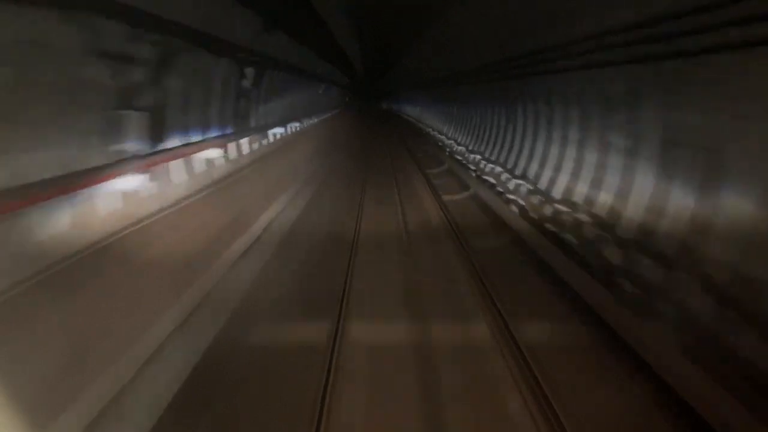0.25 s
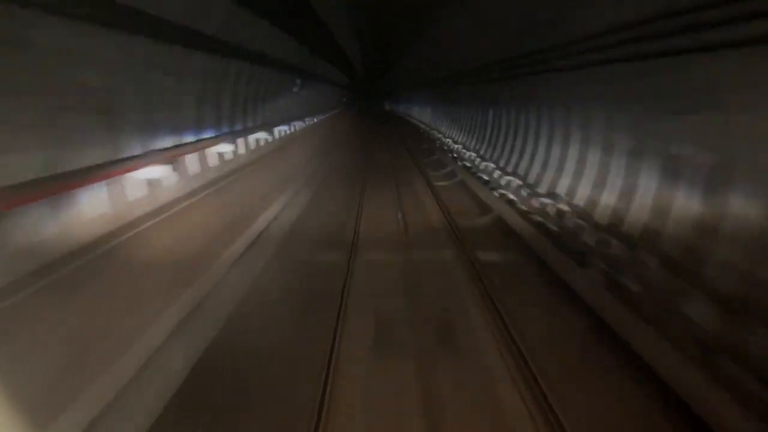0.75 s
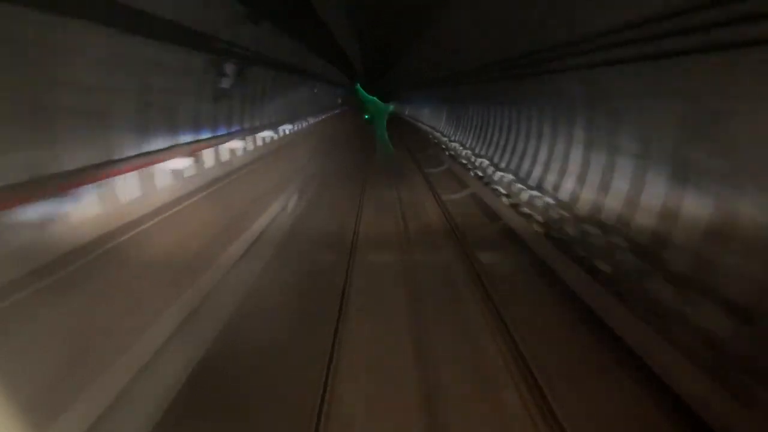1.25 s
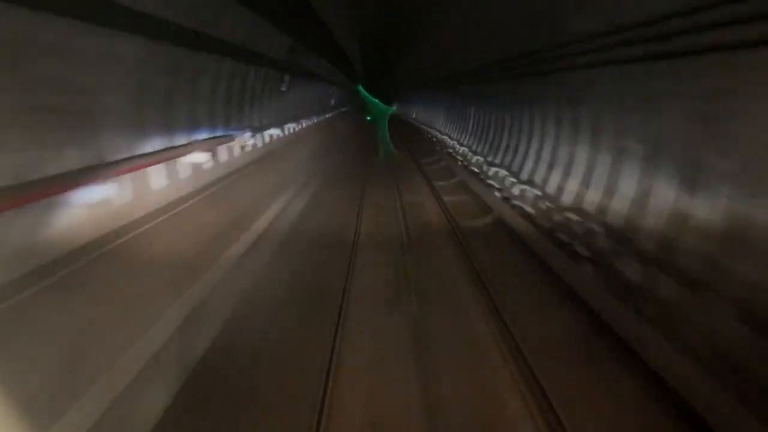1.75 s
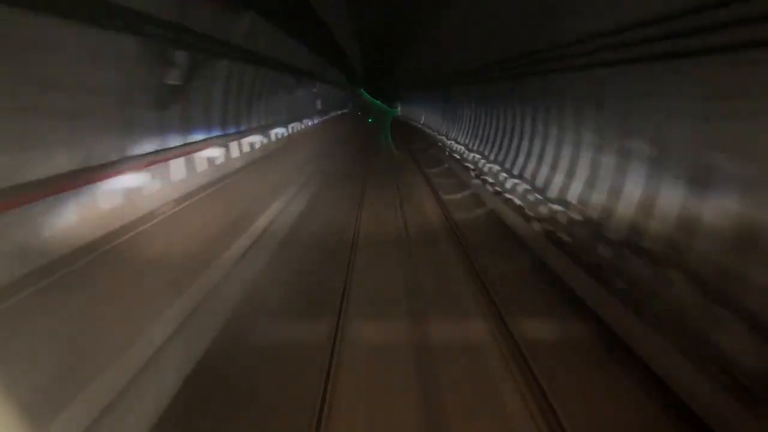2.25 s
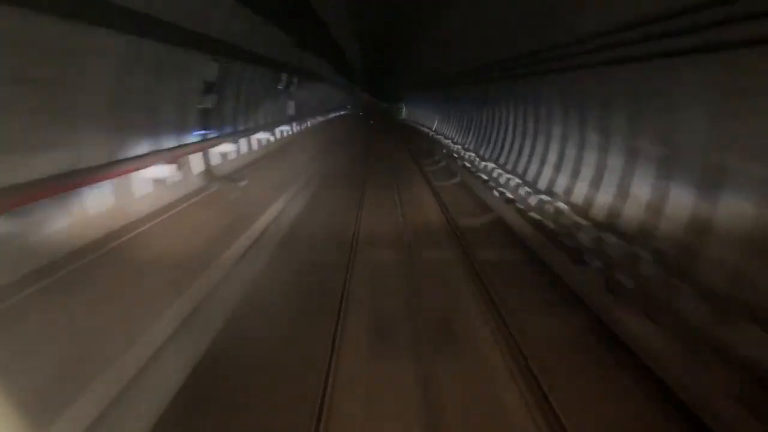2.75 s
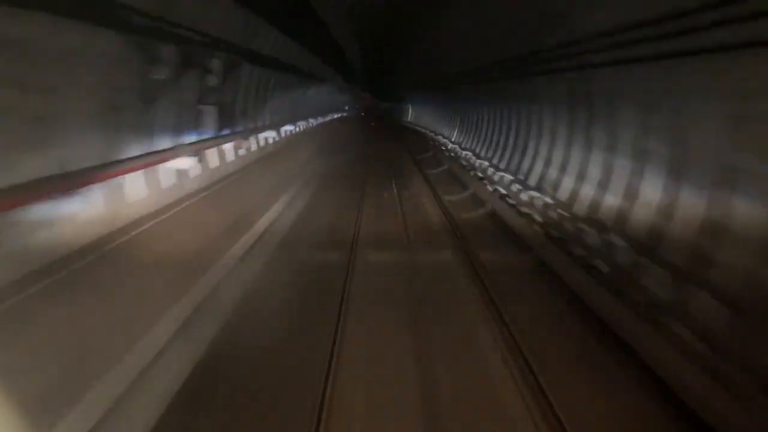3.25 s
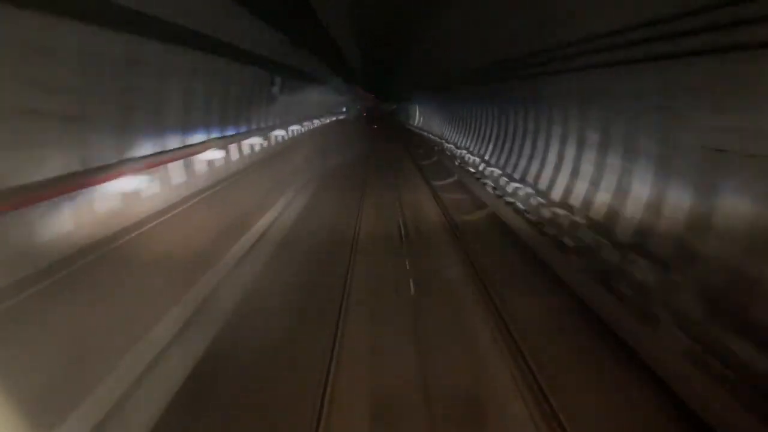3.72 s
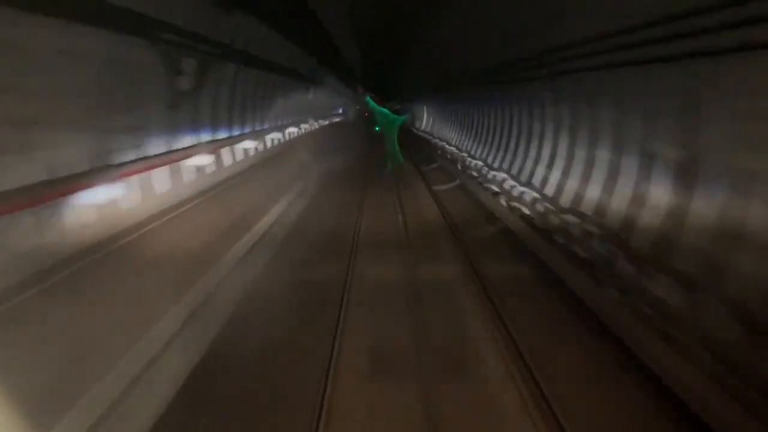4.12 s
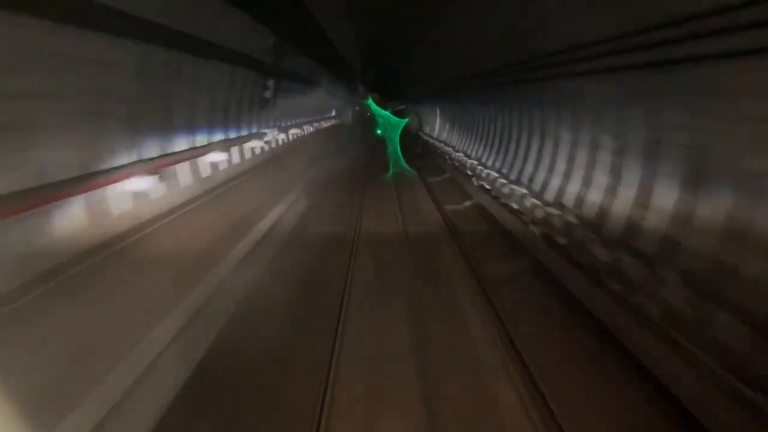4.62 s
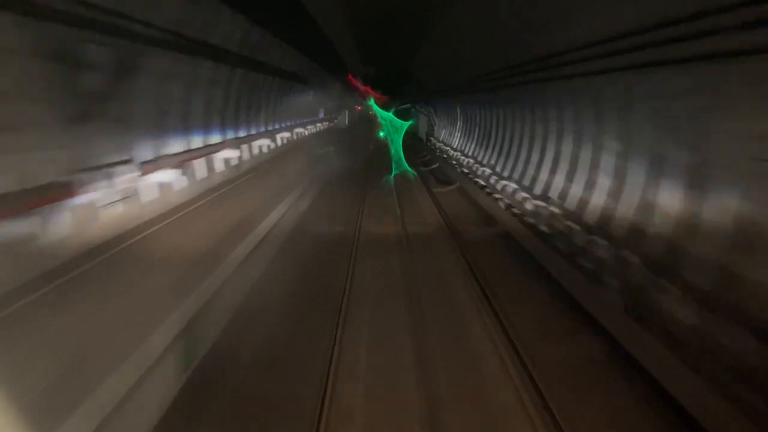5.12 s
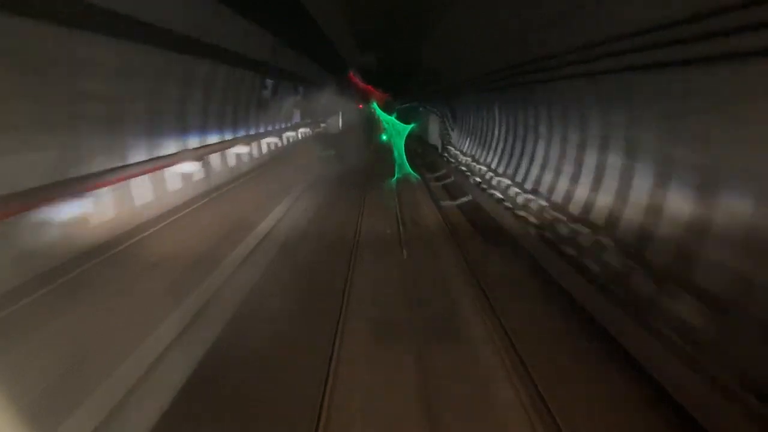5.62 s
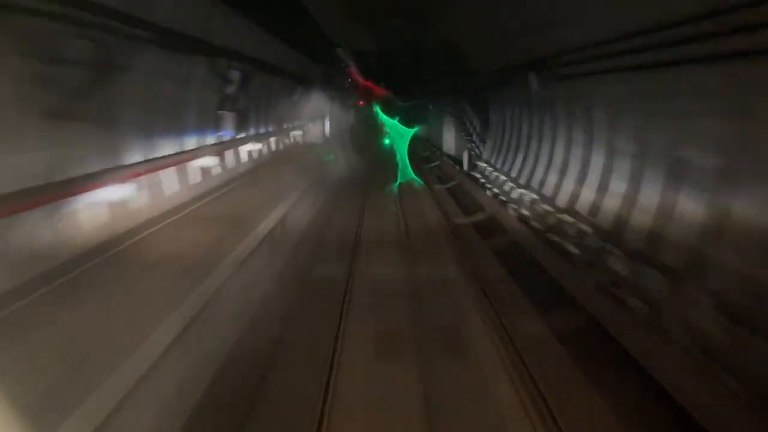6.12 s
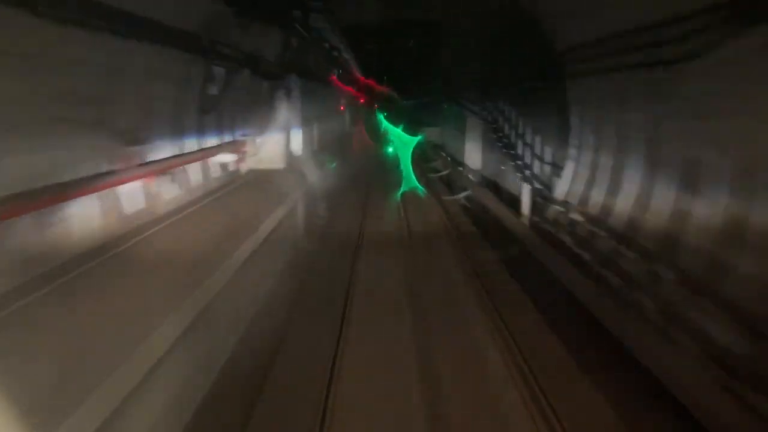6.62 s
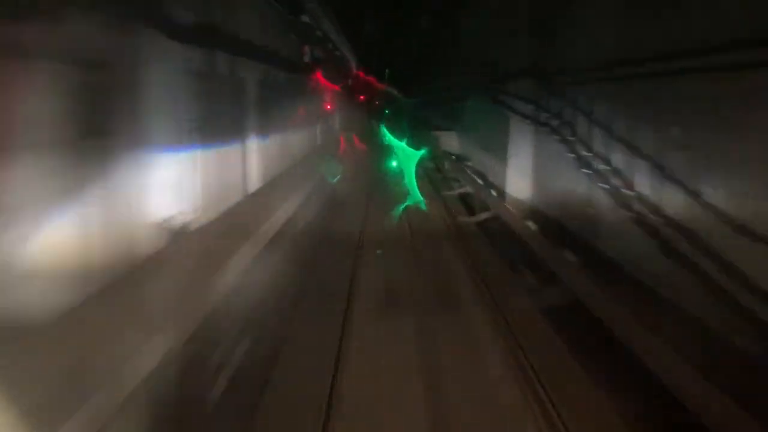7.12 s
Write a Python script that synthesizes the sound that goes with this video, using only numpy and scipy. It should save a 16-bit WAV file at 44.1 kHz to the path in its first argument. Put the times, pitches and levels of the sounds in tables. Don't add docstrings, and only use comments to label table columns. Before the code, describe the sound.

A metro train runs fast through a tunnel with heavy rolling rumble, dull low thumps, a wavering high whine and faint flange squeal later.

```python
import sys
import numpy as np
from scipy import signal
from scipy.fft import rfft, irfft, next_fast_len
from scipy.io import wavfile
from scipy.ndimage import map_coordinates

SR = 44100
rng = np.random.default_rng(int(sys.argv[2]) if len(sys.argv) > 2 else 0)


def attenuation_scalar(level_db):
    decades = np.asarray(level_db, float) / 20
    return 10 ** decades


def wav_out(sig):
    wavfile.write(sys.argv[1], SR, np.round(np.clip(np.atleast_2d(sig).T, -1, 1) * 32767).astype(np.int16))


N = 325017

# (time [s], peak [dB], length [s], pitch [Hz])
BODY_BUMPS = [(0.154, -15.5, 0.081, 57.93), (0.303, -25, 0.05, 62.06), (0.619, -15.5, 0.051, 60.88),
              (0.854, -16, .13, 62.2), (1.004, -13.7, 0.053, 60.74), (1.608, -20, .1, 58.7),
              (1.842, -13, 0.055, 63.37), (1.978, -13, 0.055, 57.1), (2.504, -10.5, 0.1, 60.16),
              (2.638, -11, 0.053, 59.5), (2.871, -10, 0.06, 61.98), (2.987, -11.5, 0.092, 58.04),
              (3.58, -11, 0.14, 58.86), (3.687, -14, .06, 62.5), (3.911, -12.8, 0.059, 65.2),
              (4.065, -16, .06, 72.4), (4.197, -13, .06, 57.68), (4.422, -16, 0.054, 61.6),
              (4.832, -13.1, 0.2, 63.05), (5.24, -15.2, 0.08, 59.02), (5.403, -20, .06, 65.44),
              (5.523, -24, .06, 61.4), (5.832, -21.5, 0.11, 59.2), (6.01, -13, 0.066, 63.33),
              (6.191, -10, 0.1, 58.75), (6.448, -12.5, 0.14, 58.3), (6.563, -11.7, 0.057, 59.7),
              (6.87, -14.5, 0.073, 56.94), (7.108, -11, .06, 59.5), (7.24, -11.5, 0.064, 60.1)]
# (time [s], level [dB])
RAIL_ROUGHNESS = [(0, -22), (.24, -21), (.53, -19.5), (.62, -22.5), (.88, -19), (1.35, -21), (1.54, -19.5),
                  (1.7, -21.5), (3.26, -21), (4.15, -19.5), (4.3, -22.5), (4.47, -19.5), (5.05, -21.5),
                  (5.5, -20), (5.95, -22), (6.72, -18.5), (7.0, -21.5), (7.37, -19.5)]
# (frequency [Hz], density [dB/Hz])
RUMBLE_SHARED = [(15, -58.5), (22, -35), (36, -14), (50, -2.5), (60, -0.5), (85, -1.5), (110, -6.5),
                 (125, -4.5), (157, -10.5), (209, -9.5), (270, -14.5), (300, -16.5), (390, -37.5),
                 (660, -120)]
RUMBLE_OPPOSED = [(15, -51.5), (22, -21.5), (59, -4), (151, -14), (215, -4.5), (245, -5.5), (290, -12),
                  (390, -39), (660, -120)]
# (frequency [Hz], density [dB/Hz])
ROAR_SHARED = [(180, -38), (300, -6.5), (377, -3), (437, -1), (549, -6.5), (868, -3), (977, -8.5),
               (1120, -18.5), (1500, -24), (1630, -23), (1750, -23.5), (2280, -58), (3850, -120)]
ROAR_OPPOSED = [(200, -42), (300, -7.5), (330, -7), (400, -3.5), (570, -6), (760, -5.5), (1040, -13.5),
                (1220, -10.5), (1750, -21.5), (2280, -52), (3850, -120)]
# (time [s], pitch [Hz])
MESH_PITCH = [
    (0, 2055),
    (1.7, 2064),
    (3.5, 2069),
    (4.1, 2052),
    (7.37, 2081),
]
# (time [s], peak [dB], length [s])
MESH_BEATS = [(0.04, -32, 0.27), (0.8, -34.5, 0.11), (0.97, -36.5, 0.06), (1.23, -35.5, 0.09),
              (1.7, -30, 0.28), (2.11, -33.6, 0.083), (2.47, -32.5, 0.15), (2.9, -31, 0.1),
              (3.26, -31.5, 0.08), (3.41, -32.5, 0.17), (3.89, -36.5, 0.3), (4.33, -34, 0.049),
              (4.59, -36.5, 0.17), (4.9, -30.5, 0.12), (5.2, -38, 0.059), (5.41, -33.5, 0.077),
              (5.57, -32, 0.067), (5.76, -33.5, 0.16), (5.98, -35, 0.11), (6.15, -36, 0.14),
              (6.41, -36, 0.082), (6.78, -29.0, 0.17), (7.14, -37, 0.1), (7.31, -43, 0.1)]
# (frequency [Hz], density [dB/Hz])
TEETH_SHARED = [(1650, -120), (1720, -10.5), (1850, -2), (1930, 4.5), (2070, 7), (2200, 3), (2300, -3.5),
                (2450, -9), (2600, -11.5), (2700, -120)]
TEETH_OPPOSED = [(1650, -120), (1760, -10), (1870, -4.5), (1920, 3.5), (2050, -1), (2200, -12.5),
                 (2350, -11.5), (2600, -29), (2700, -120)]
# (frequency [Hz], width [Hz], level [dB], right port gain [ratio])
PANEL_MODES = [(191.5, 12, -33.5, 1), (212.5, 16, -31.5, 0.65), (326, 28, -41.5, 1), (358.3, 33, -37, 0.73),
               (433, 27, -36.5, 1), (466.6, 26, -36, .8), (522, 10, -42, -1.3), (718, 57, -39.5, 0.99),
               (870, 42, -36.5, 0.38), (954, 36, -38.5, 0.56), (410, 16, -46, -0.92), (2166, 21, -49, 0.99),
               (3163, 120, -51, 0.4), (9700, 90, -88, .1)]
# (time [s], peak [dB], length [s])
LOW_PANEL_JOLTS = [(0.52, -20, 0.13), (0.99, -22, 0.18), (1.55, -21, 0.16), (1.91, -23.5, 0.17),
                   (3.75, -23, 0.14), (4.18, -24, 0.15), (4.5, -22, 0.18), (4.75, -24.5, 0.16),
                   (5.28, -23.7, 0.18), (5.59, -23.5, 0.2), (6.44, -24.5, 0.16), (6.79, -26, 0.2)]
MIDDLE_PANEL_JOLTS = [(0.5, -30.5, 0.4), (3.89, -27.5, 0.4), (4.52, -28.5, 0.2), (4.72, -27, 0.22),
                      (5.13, -24.5, 0.16), (5.69, -25, 0.28), (6.0, -25, 0.14), (6.5, -24.5, 0.18),
                      (6.9, -28.5, 0.16), (7.32, -24.5, 0.14)]
# (frequency [Hz], level [dB], right port gain [ratio])
CONVERTER_TONES = [
    (282.4, -32.5, -.5),
    (399.5, -37, .8),
    (564.8, -39.5, -1.0),
    (1187, -46, -.3),
]
# (frequency [Hz], density [dB/Hz])
HISS_SHARED = [(2300, -58), (2600, -6.5), (2800, -2.5), (3000, -8.5), (3500, -16), (3900, -12), (4050, -14),
               (4450, -12.5), (4700, -21), (5300, -17.5), (6200, -23), (6500, -27), (7500, -36.5),
               (8200, -120)]
HISS_OPPOSED = [(2300, -58.5), (2550, -1), (3000, 1.5), (3500, -2), (3900, -5.5), (4100, -7), (4800, -10),
                (5300, -5.5), (5800, -14.5), (6500, -17), (7300, -19.5), (8800, -20), (9600, -23),
                (10500, -120)]
# (frequency [Hz], density [dB/Hz])
FIZZ_SHARED = [(7000, -120), (7500, -17.5), (8800, -7.5), (9400, -2), (9750, 0), (11000, -2.5), (12100, -4),
               (12400, -7.5), (13700, -10.5), (13900, -22), (16000, -120)]
FIZZ_OPPOSED = [(8500, -120), (9200, -8.5), (9750, -4), (10200, -10), (11500, -28), (12600, -17.5),
                (13500, -11), (14600, -4), (15200, -6.5), (15700, -11.5), (16000, -120)]
# (time [s], peak [dB], length [s])
FLANGE_RUBS = [
    (4.03, -48, .15),
    (4.32, -47.5, .25),
    (4.85, -43.5, .55),
    (5.38, -43.5, 0.39),
    (5.82, -42.5, 0.22),
    (6.4, -49, .7),
]
# (frequency [Hz], lean [-1 right .. 1 left])
PORT_LEAN = [(40, .2), (150, .25), (240, .4), (340, -.05), (480, .15), (620, 0), (1100, .15), (1500, .1),
             (1800, .5), (2100, .15), (2600, -.2), (3300, .6), (5000, .4), (7000, 0)]
# (frequency [Hz], share [ratio])
PORT_AHEAD = [(200, -.1), (500, -.3), (1000, -.3), (1700, 0), (2200, .1), (3000, .3), (4300, .1),
              (5000, .3), (5600, 0), (6500, -.5), (7300, -.3), (9000, 0)]


def unit(x):
    return x / np.sqrt(np.mean(x ** 2) + 1e-20)


def along(points, hz):
    f, v = np.transpose(points)
    return np.interp(np.log(hz + 1), np.log(f + 1), v)


def curves(rows):
    time_s, *columns = np.transpose(rows)
    return [np.interp(np.arange(N) / SR, time_s, column) for column in columns]


def wobble(rate_hz):
    knots = rng.standard_normal(int(N * rate_hz / SR) + 4)
    return map_coordinates(knots, [np.arange(N) * rate_hz / SR])


def swells(rows, rest_db):
    t = np.arange(0, N + 64, 64) / SR
    power = attenuation_scalar(2 * rest_db)
    for time_s, peak_db, length_s, *_ in rows:
        bell = np.exp(-2 * np.log(16) * ((t - time_s) / (1.15 * length_s)) ** 2)
        power = power + attenuation_scalar(2 * peak_db) * bell
    return np.interp(np.arange(N) / SR, t, 10 * np.log10(power))


def filtered(x, response):
    m = next_fast_len(N + 8192)
    return irfft(rfft(x, m) * response(np.fft.rfftfreq(m, 1 / SR)), m)[..., :N]


def ring(hz, width_hz):
    noise = rng.standard_normal(N)
    return unit(filtered(noise, lambda f: 1 / (1 + ((f - hz) / width_hz * 2) ** 2)))


def tone(hz, drift_rad):
    return np.sqrt(2) * np.sin(2 * np.pi * np.cumsum(hz) / SR + drift_rad)


def ports(left, right):
    return np.array([[left], [right]])


def rush(shared, opposed, side_db):
    common, separate = rng.standard_normal((2, N))

    def link(hz):
        lean = np.clip(along(PORT_LEAN, hz), -.7, .7)
        ahead = np.clip(along(PORT_AHEAD, hz), -.7, .7)
        return lean + 1j * ahead

    def linked(hz):
        return attenuation_scalar(along(opposed, hz)) * link(hz)

    def unlinked(hz):
        return attenuation_scalar(along(opposed, hz)) * np.sqrt(1 - abs(link(hz)) ** 2)

    mid = unit(filtered(common, lambda hz: attenuation_scalar(along(shared, hz))))
    side = filtered(common, linked) + filtered(separate, unlinked)
    side = attenuation_scalar(side_db) * unit(side)
    return np.array([mid + side, mid - side])


def body():
    pitch_hz, = curves([(time_s, hz) for time_s, _, _, hz in BODY_BUMPS])
    level_db = swells(BODY_BUMPS, rest_db=-28) - 1.5 + 0.47 * wobble(12)
    return attenuation_scalar(level_db) * tone(pitch_hz, .7 * wobble(14)) * attenuation_scalar(ports(.2, -.2))


def wheels():
    rough_db, = curves(RAIL_ROUGHNESS)
    roar_db = -26 + .4 * (rough_db - rough_db.mean())
    rumble_gain = attenuation_scalar(rough_db + 2.15 + 0.16 * wobble(6))
    roar_gain = attenuation_scalar(roar_db + 1.91 + 0.8 * wobble(12))
    rumble = rumble_gain * rush(RUMBLE_SHARED, RUMBLE_OPPOSED, side_db=-13)
    roar = roar_gain * rush(ROAR_SHARED, ROAR_OPPOSED, side_db=-1.5)
    return rumble + roar


def gearbox():
    pitch_hz, = curves(MESH_PITCH)
    beat_db = swells(MESH_BEATS, rest_db=-43)
    whine = attenuation_scalar(beat_db + 1.5 + 0.49 * wobble(22)) * tone(pitch_hz, .6 * wobble(22))
    teeth_db = -36 + 0.1 * (beat_db - beat_db.mean()) + 6.0 + 0.23 * wobble(14)
    teeth = attenuation_scalar(teeth_db) * rush(TEETH_SHARED, TEETH_OPPOSED, side_db=-6.5)
    return whine * ports(1.25, .75) + teeth


def panels():
    low_db = swells(LOW_PANEL_JOLTS, rest_db=-28.5)
    middle_db = swells(MIDDLE_PANEL_JOLTS, rest_db=-30.5)
    low_db, middle_db = low_db - low_db.mean(), middle_db - middle_db.mean()
    total = np.zeros((2, N))
    for hz, width_hz, level_db, right in PANEL_MODES:
        swell_db = low_db if hz < 300 else middle_db if hz < 520 else 0
        gain = attenuation_scalar(level_db + 1.34 * swell_db + 2.3 * wobble(1.3))
        total += gain * ring(hz, width_hz) * ports(1, right)
    return total


def converter():
    total = np.zeros((2, N))
    for hz, level_db, right in CONVERTER_TONES:
        gain = attenuation_scalar(level_db + 0.98 * wobble(4.5))
        total += gain * tone(np.full(N, hz), .5 * wobble(6)) * ports(1, right)
    return total


def air():
    hiss = attenuation_scalar(-51 + 5.0 + .3 * wobble(4)) * rush(HISS_SHARED, HISS_OPPOSED, side_db=-5.0)
    fizz = attenuation_scalar(-73.5 + .8 * wobble(2.6)) * rush(FIZZ_SHARED, FIZZ_OPPOSED, side_db=-4.0)
    return hiss + fizz


def flanges():
    level_db = swells(FLANGE_RUBS, rest_db=-53.5) - 1.5
    return attenuation_scalar(level_db) * ring(hz=2700, width_hz=150) * ports(1.1, .9)


def scene():
    return body() + wheels() + gearbox() + panels() + converter() + air() + flanges()


def roll_off(x):
    return signal.sosfilt(signal.butter(12, 15700, fs=SR, output="sos"), x)


def record(dry):
    ceiling, knee, fade_s = .95, 6, .004
    soft = dry / (1 + abs(dry / ceiling) ** knee) ** (1 / knee)
    sample = np.arange(N)
    from_end_s = np.minimum(sample, sample[::-1]) / SR
    fade = np.sin(np.pi / 2 * np.minimum(from_end_s / fade_s, 1)) ** 2
    return roll_off(soft * fade)


dry = scene()
out = record(dry)
wav_out(out)
```